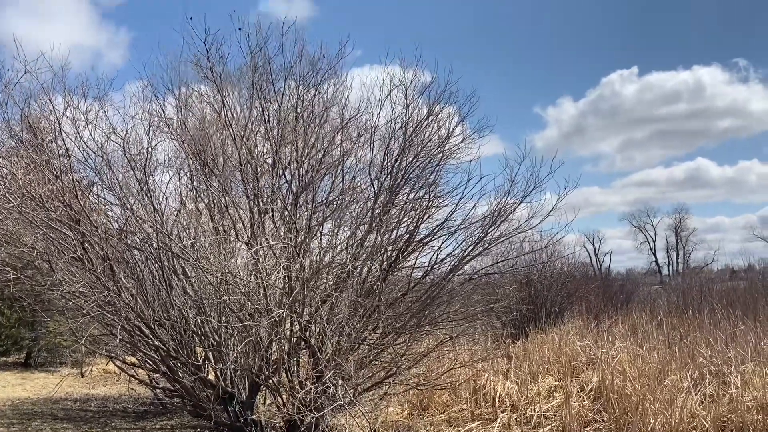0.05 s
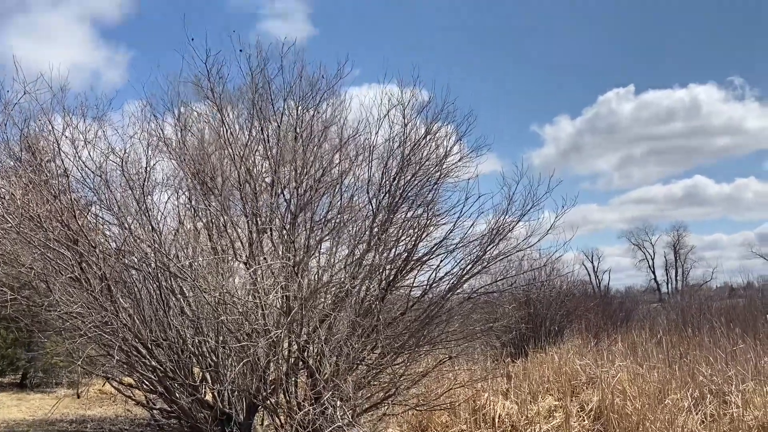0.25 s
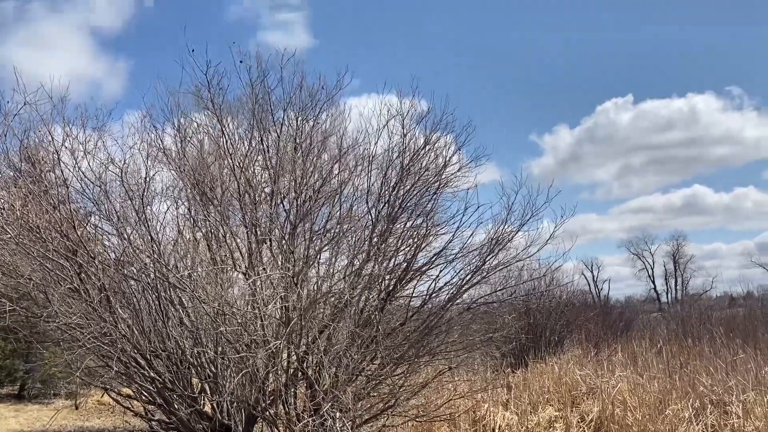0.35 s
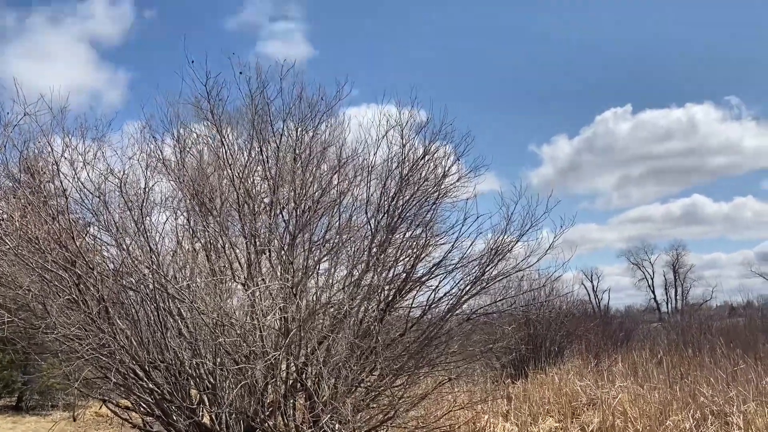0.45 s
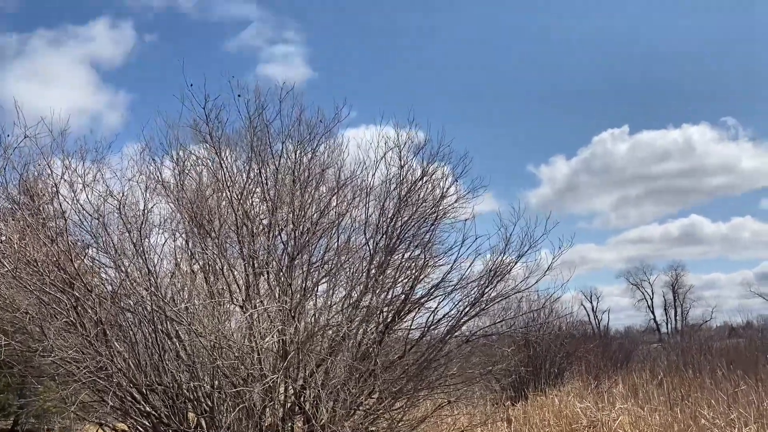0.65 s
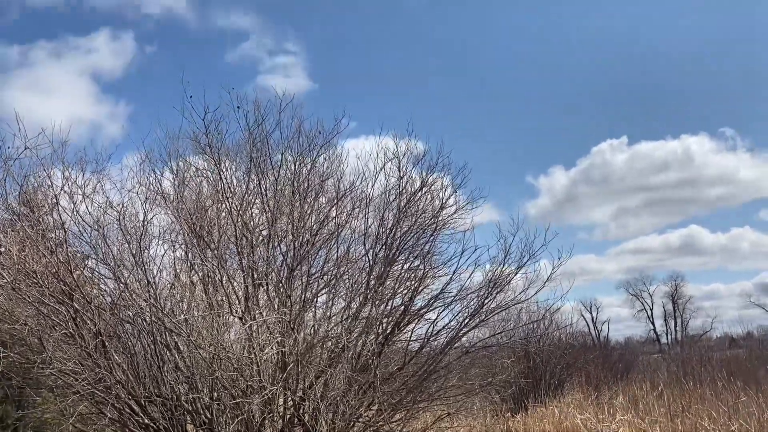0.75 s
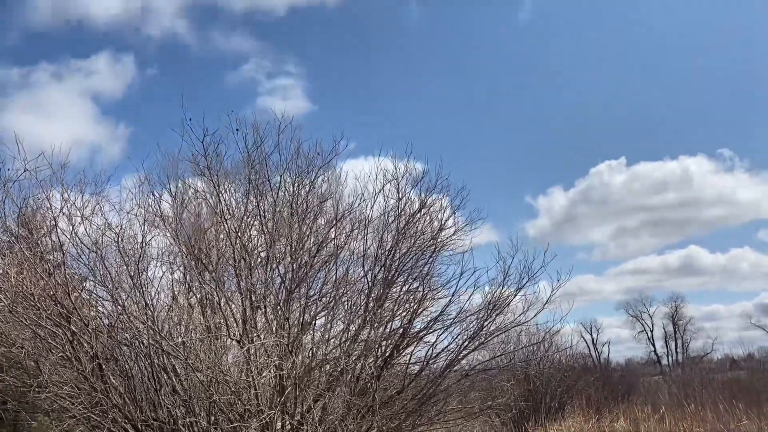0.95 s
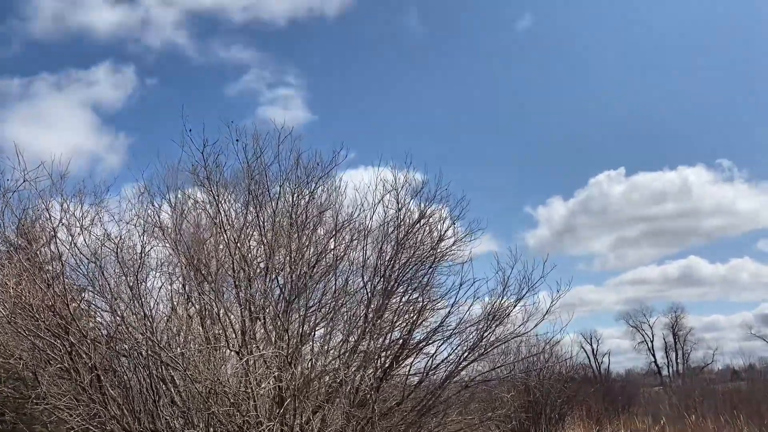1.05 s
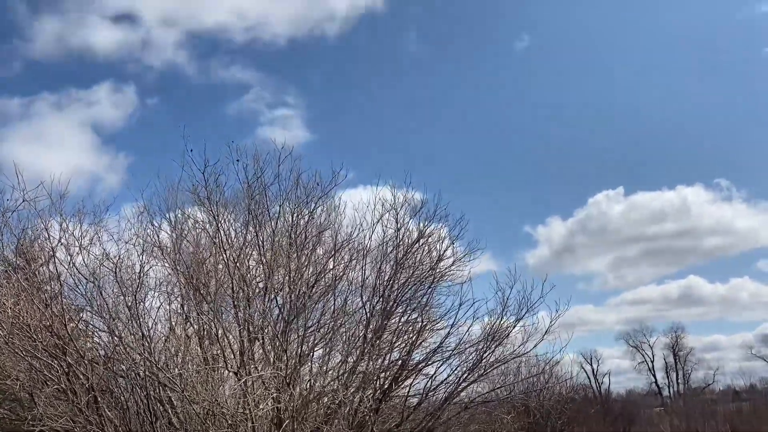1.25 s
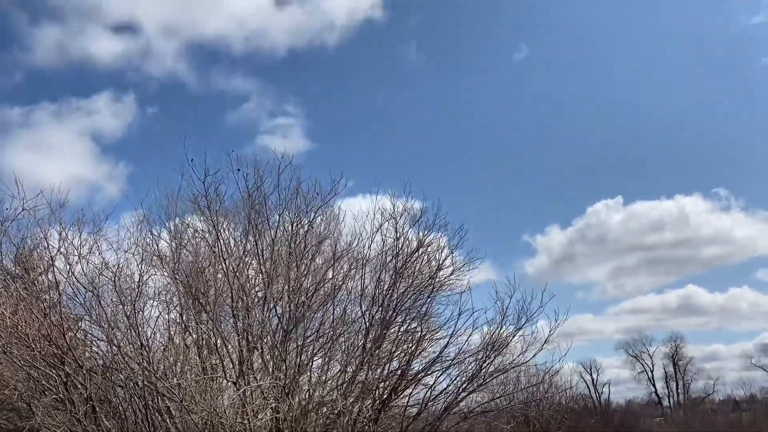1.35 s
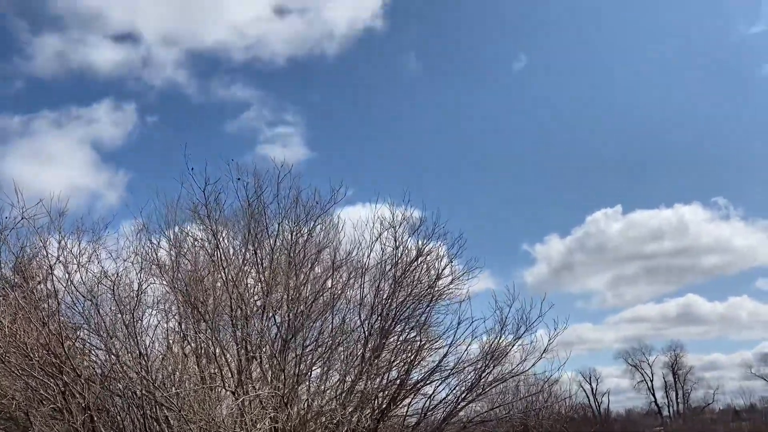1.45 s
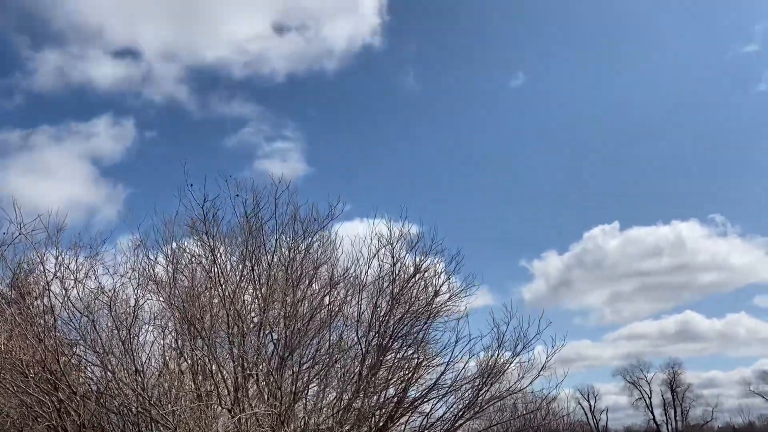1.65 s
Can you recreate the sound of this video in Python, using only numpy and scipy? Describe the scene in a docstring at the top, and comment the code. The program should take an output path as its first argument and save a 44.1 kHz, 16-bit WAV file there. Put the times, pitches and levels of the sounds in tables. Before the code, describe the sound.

A dense chorus of small frogs calls throughout, dry ticks close by over a trill farther off. At about 0.3 seconds a wind gust rumbles on the microphone, followed by faint, falling chirps of distant birds. Near 1 second another gust hits, one frog adds lower clacks and the close ticks shift left. The trill eases slightly toward 1.7 seconds, with a very faint rustle of dry grass.

```python
"""A reedy marsh in open country, a stereo microphone set out in the wind among small frogs.
From the start they call in runs of short dry pulses: single ticks close by, dozens merging into a trill
farther off. At 0.3 s a gust rumbles and buffets on the microphone, then distant birds slur down over the
chorus. Near 1 s a second gust hits, one frog adds a run of lower clacks and the close ticks lean left.
Toward 1.7 s the trill eases and dry grass rustles faintly."""
import sys
import numpy as np
from scipy import signal
from scipy.fft import rfft, irfft
from scipy.io import wavfile
from scipy.ndimage import uniform_filter1d

SR = 44100
rng = np.random.default_rng(int(sys.argv[2]) if len(sys.argv) > 2 else 0)


def store_pcm(level_fs):
    """Save levels as 16-bit WAV."""
    pcm = np.round(np.clip(level_fs, -1, 1) * 32767).astype(np.int16)
    wavfile.write(sys.argv[1], SR, np.atleast_2d(pcm).T)


N = 74970
T = np.arange(N) / SR

# ticks of the closest frogs: peak_s, main_db, main_hz, fundamental_db (an octave below the main partial)
NEAR_TICKS = [(0.0093, -38, 3296, -52), (0.028, -42, 3460, -48.5), (0.0487, -57, 3290, -51.0),
              (0.0831, -36.5, 3296, -52.5), (0.151, -36.5, 3350, -52.5), (0.2006, -44, 3730, -65),
              (0.2085, -43.5, 3190, -51), (0.2204, -41.5, 3530, -55), (0.2591, -44.5, 3370, -56),
              (0.2717, -41.0, 3270, -53), (0.2933, -41.5, 3644, -50.5), (0.3336, -42.5, 3340, -56),
              (0.3718, -42.5, 3350, -58), (0.393, -43, 3320, -53), (0.4335, -39.5, 3370, -52),
              (0.4467, -44.5, 3390, -53), (0.4616, -42.5, 3460, -68), (0.4836, -42.5, 3150, -55),
              (0.511, -41, 3530, -52), (0.532, -42.5, 3230, -56), (0.5429, -50, 3300, -55),
              (0.5569, -44, 3410, -58), (0.5823, -40.0, 3240, -61), (0.5994, -41, 3424, -58),
              (0.609, -40.5, 3380, -57), (0.6355, -38.5, 3317, -56), (0.6639, -39.5, 3330, -66),
              (0.6781, -38.5, 3424, -57), (0.6923, -40, 3310, -62), (0.7433, -40, 3370, -54),
              (0.7519, -38.0, 3310, -54), (0.7877, -43, 3560, -62), (0.811, -38.5, 3460, -51),
              (0.828, -44.0, 3380, -57), (0.8549, -37, 3347, -51), (0.8705, -39.5, 3406, -46.5),
              (0.8971, -39, 3510, -53), (0.9058, -34.5, 3310, -52.5), (0.9208, -40.0, 3430, -58),
              (0.9463, -47, 3350, -51), (0.9565, -38, 3500, -49), (0.9664, -40.5, 3474, -62),
              (0.9819, -38, 3586, -50), (1.0081, -44, 3450, -50), (1.0464, -43.5, 3380, -54),
              (1.0609, -35.5, 3484, -49.5), (1.07, -38, 3690, -50), (1.105, -50, 3520, -57),
              (1.1194, -37.5, 3600, -45), (1.1567, -39.5, 3600, -51.0), (1.1863, -41, 3610, -55),
              (1.2189, -40.5, 3440, -59), (1.2383, -44.0, 3680, -49), (1.2602, -41.5, 3680, -50),
              (1.3379, -43.5, 3690, -51.5), (1.351, -43.5, 3440, -58), (1.3782, -43.5, 3280, -69),
              (1.3917, -46.5, 3000, -74), (1.4137, -47, 3830, -54), (1.4281, -41.5, 3475, -64),
              (1.4366, -55, 3380, -64), (1.4443, -46.5, 3105, -74), (1.4793, -45.0, 3334, -63),
              (1.5055, -41.5, 3460, -55), (1.5305, -46.5, 3235, -59), (1.5581, -42, 3310, -57),
              (1.5857, -44, 3320, -52.5), (1.6025, -47.5, 3445, -68), (1.6164, -40.5, 3208, -62),
              (1.6316, -43, 3540, -61), (1.64, -48, 3290, -56.5), (1.6671, -45.5, 3225, -58),
              (1.6796, -44, 3195, -52)]
NEAR_TRIM_DB, FUNDAMENTAL_TRIM_DB = 1.3, 1.8  # added to the two level columns
# where the closest callers sit: time_s, left_minus_right_db
NEAR_BALANCE = [(0, 0), (.7, 1), (1.05, 4.5), (1.7, 5)]
PULSE_RISE_S, FUNDAMENTAL_RISE_S = .0036, .0026  # the fundamental peaks and dies sooner: a woody tick
PULSE_SHARPNESS, PULSE_SAG_HZ_PER_S, THIRD_PARTIAL_DB = 7.5, 5000, -28.5
SCATTER_DB, SCATTER_T60_S = -4.5, .024  # echoes off reeds and shrubs

# swell of the far chorus: time_s, gain_db
CHORUS_GAIN = [(0, 1), (.35, -1.5), (.65, -1), (.95, 0), (1.2, -0.5), (1.4, -1.5), (1.7, -3.5)]
# its middle pitch wanders as callers take over from each other: time_s, offset_hz
CHORUS_PITCH_DRIFT = [(0, -12), (.35, -21), (.7, -37), (.95, 78), (1.1, 157), (1.27, 141), (1.42, -115),
                      (1.7, -120)]
# blur of the most distant frogs: frequency_hz, density_db
BLUR_SPECTRUM = [(1100, -22.5), (1500, -10.5), (1750, -9.5), (1950, -4.5), (2200, -14.5), (2650, -13.5),
                 (2950, -7.5), (3200, 4), (3550, 1.5), (3850, 0.5), (4150, -13), (5000, -17), (6000, -32.5),
                 (9000, -50)]
FROG_COUNT, FAR_HZ, FAR_SPREAD_HZ = 26, 3397, 314
FAR_DB, FAR_FUNDAMENTAL_DB, FAR_SPREAD_DB, BLUR_DB = -53.5, -8.5, 2, -56.5
PULSE_GAP_S, GAP_GROWTH_S_PER_S, CALL_S, REST_S = .052, .016, 1.0, .3

# one frog's run of drier, lower clacks: peak_s, level_db
CLACK_RUN = [(0.956, -46), (1.009, -46), (1.061, -46), (1.119, -50.5), (1.174, -44), (1.234, -53),
             (1.291, -51)]
CLACK_START_HZ, CLACK_END_HZ, CLACK_GLIDE_S, CLACK_RISE_S = 3680, 1540, .00071, .0011

# gusts on the microphone: time_s, level_db
GUSTS = [(0, -55), (.09, -47), (.165, -54), (.2, -47.5), (.3, -33.5), (.36, -41), (.44, -43), (.52, -42.5),
         (.575, -57.5), (.65, -52), (.78, -48), (.85, -52), (.89, -42), (.96, -34.5), (1.02, -42.5),
         (1.09, -42.5), (1.16, -61), (1.22, -47.5), (1.31, -58.5), (1.49, -52), (1.62, -47), (1.7, -54.5)]
# colour of their rumble: frequency_hz, density_db
RUMBLE_SPECTRUM = [(20, -48), (32, -12), (55, 10.5), (75, 8), (110, -1.5), (170, -10.5), (260, -29),
                   (450, -65.5), (1500, -73)]
# eddies that hit the microphone: peak_s, level_db, pitch_hz, half_length_s
EDDIES = [(0.199, -34.5, 60, 0.0099), (.257, -37, 176, 0.0056), (.267, -29, 93, 0.0045),
          (0.2921, -29, 181, 0.0057), (.3062, -18.5, 67.4, 0.0065), (0.413, -30.5, 69.4, 0.0061),
          (0.768, -44.5, 244, 0.0037), (.783, -39.5, 103, 0.0058), (0.89, -39, 180, 0.0054),
          (0.897, -43, 80, 0.0048), (0.9548, -25.5, 160, 0.0019), (0.9715, -26, 87, 0.0056),
          (0.984, -25.5, 52.4, 0.0047), (1.029, -44.5, 192, .0038), (1.07, -41.5, 129, 0.0026),
          (1.35, -43.5, 165, 0.005), (1.445, -44.5, 140, 0.0049), (1.54, -37.5, 68, 0.015),
          (1.613, -42.5, 115, 0.0061), (1.65, -37.5, 117, 0.0029)]
RUMBLE_TRIM_DB, RUMBLE_SIDE_DB = -1, -11.5
FLUTTER_DB, FLUTTER_TOP_HZ, FAST_EDDY_HZ = -17.5, 395, 189

# notes of distant birds: start_s, length_s, first_hz, last_hz, level_db
BIRD_SLURS = [(0, 0.018, 7300, 5300, -65.5), (0.491, .014, 4500, 3830, -60), (0.526, 0.04, 2840, 2020, -61),
              (0.571, .018, 4000, 4960, -65), (0.614, 0.018, 3350, 2470, -52),
              (0.646, 0.029, 3200, 2240, -55), (.668, 0.02, 4900, 4500, -67),
              (0.875, 0.031, 5450, 4800, -57.5), (.972, 0.041, 5440, 5190, -66),
              (0.993, 0.063, 5330, 4600, -61), (1.033, 0.02, 3130, 2310, -57),
              (1.036, 0.037, 4610, 4360, -58), (1.132, 0.029, 2810, 2150, -64),
              (1.42, 0.013, 5500, 4930, -62), (1.531, 0.013, 2960, 2240, -59)]
BIRD_WAVER_HZ, BIRD_WAVER_PER_S, BIRD_ROUGHNESS = 75, 600, .35

# dry grass in the breeze: time_s, level_db
RUSTLE_LEVEL = [(0, -98), (.07, -92), (.11, -80), (.2, -98), (.28, -72), (.35, -99), (.6, -84), (1.0, -104),
                (1.33, -86), (1.42, -75), (1.48, -82), (1.55, -75), (1.62, -86), (1.7, -67)]
# colour of the grass: frequency_hz, density_db
RUSTLE_SPECTRUM = [(2000, -10), (5000, -13), (7000, -18), (11000, -5), (15000, -27)]
# hush of open air: frequency_hz, density_db
AIR_SPECTRUM = [(100, 2.5), (250, 0.5), (450, -3.5), (900, -1.5), (1300, -7), (2400, -31), (4500, -35),
                (5900, -24), (7000, -26), (11000, -33), (13000, -29.5), (15000, -64)]
AIR_DB = -58

# how alike sound from all round is on the two sides: frequency_hz, correlation
SIDE_CORRELATION = [(100, 0.16), (250, 0.17), (550, -0.096), (1100, -0.45), (1800, 0.33), (3400, 0.76),
                    (5000, 0.82), (7500, 0.098), (11000, -0.13)]
# the two microphone ports differ in colour: frequency_hz, left_minus_right_db
PORT_COLOUR = [(250, 1), (650, 3.5), (1100, 2), (1600, -5.5), (2200, -2.5), (3200, 1), (5000, 0.5),
               (8000, 0)]
CUTOFF_HZ = 15900


def frog_pulse(hz, main_db, fundamental_db):
    """One puff through the larynx: three partials sag in pitch, the second boosted by the vocal sac."""
    t = T[:SR // 60]
    phase = np.pi * np.cumsum(hz - PULSE_SAG_HZ_PER_S * (t - PULSE_RISE_S)) / SR  # an octave below hz
    partials = [(1, fundamental_db, FUNDAMENTAL_RISE_S), (2, main_db, PULSE_RISE_S),
                (3, main_db + THIRD_PARTIAL_DB, PULSE_RISE_S)]
    return sum(from_db(db) * swell(t / rise_s, PULSE_SHARPNESS)
               * np.sin(harmonic * phase + rng.uniform(0, 2 * np.pi)) for harmonic, db, rise_s in partials)


def near_frogs():
    """Callers close to the microphone, a little to the left, each tick scattering off the reeds."""
    ticks = np.zeros(N)
    for peak_s, main_db, hz, fundamental_db in NEAR_TICKS:
        pulse = frog_pulse(hz, main_db + NEAR_TRIM_DB, fundamental_db + FUNDAMENTAL_TRIM_DB)
        add(ticks, peak_s - PULSE_RISE_S, pulse)
    return pan(in_time(NEAR_BALANCE)) * (ticks + from_db(SCATTER_DB) * echoes(ticks, SCATTER_T60_S))


def far_frogs():
    """Across the marsh, each frog at its own pitch and place gives a slowing run, rests and calls again."""
    chorus = np.zeros((2, N))
    chorus_hz = FAR_HZ + in_time(CHORUS_PITCH_DRIFT)
    for rank in np.linspace(-1, 1, FROG_COUNT):
        voice, side_db = np.zeros(N), rng.normal(0, 1.0)
        first_s, pace = -rng.random() * (CALL_S + REST_S), rng.uniform(.85, 1.25)
        for call, wobbles in enumerate(rng.uniform(-1, 1, (3, 24, 3))):  # 3 calls of up to 24 pulses
            age_s = 0
            for pitch, strength, depth in wobbles:
                start_s = first_s + call * (CALL_S + REST_S) + age_s
                if age_s < CALL_S and 0 <= start_s < T[-1]:
                    hz = chorus_hz[int(start_s * SR)] + FAR_SPREAD_HZ * rank + 80 * pitch
                    pulse = frog_pulse(hz, FAR_SPREAD_DB * strength, FAR_FUNDAMENTAL_DB + 4 * depth)
                    add(voice, start_s, pulse)
                age_s += pace * (PULSE_GAP_S + GAP_GROWTH_S_PER_S * age_s)
        chorus += pan(side_db) * voice
    scatter = from_db(-12) * echoes(chorus.mean(axis=0), SCATTER_T60_S)
    trill = from_db(FAR_DB) * rms_one(chorus + scatter)
    blur = from_db(BLUR_DB) * wide_noise(BLUR_SPECTRUM)
    return pan(left_db=4) * from_db(in_time(CHORUS_GAIN)) * (trill + blur)


def clacking_frog():
    """One frog just left of centre: very short pulses that drop about an octave within a few cycles."""
    clacks, t = np.zeros(N), T[:SR // 100]
    hz = CLACK_END_HZ + (CLACK_START_HZ - CLACK_END_HZ) * np.exp(-t / CLACK_GLIDE_S)
    clack = swell(t / CLACK_RISE_S, sharpness=2) * np.sin(2 * np.pi * np.cumsum(hz) / SR)
    for peak_s, db in CLACK_RUN:
        add(clacks, peak_s - CLACK_RISE_S, from_db(db) * clack)
    return pan(left_db=1.5) * (clacks + from_db(-6) * echoes(clacks, SCATTER_T60_S))


def wind():
    """Right on the microphone: a rumble that follows the gusts, and eddies that thump and flutter."""
    flow = noise(RUMBLE_SPECTRUM)
    flow = rms_one(flow / np.sqrt(uniform_filter1d(flow ** 2, size=2200) + .01))  # evened over 50 ms
    side = from_db(RUMBLE_SIDE_DB) * noise(RUMBLE_SPECTRUM) * [[1], [-1]]
    rumble = from_db(in_time(GUSTS) + RUMBLE_TRIM_DB) * (flow + side)
    thumps, force = np.zeros(N), np.zeros(N)
    for peak_s, db, hz, half_s in EDDIES:
        push = from_db(db) * np.exp(-((T - peak_s) / half_s) ** 2)
        thumps += push * np.sin(2 * np.pi * hz * (T - peak_s))
        force += push * hz / FAST_EDDY_HZ  # slower eddies flutter less
    band = signal.butter(5, [90, FLUTTER_TOP_HZ], "band", fs=SR, output="sos")
    flutter = rms_one(signal.sosfilt(band, rng.standard_normal((2, N))))
    return rumble + thumps + from_db(FLUTTER_DB) * force * flutter


def birds():
    """Thin slurred whistles, roughened and blurred by distance."""
    song = np.zeros(N)
    for start_s, length_s, first_hz, last_hz, db in BIRD_SLURS:
        progress = np.linspace(0, 1, int(length_s * SR))
        steps = progress * length_s * BIRD_WAVER_PER_S
        waver, flicker = (np.interp(steps, np.arange(40), row) for row in rng.standard_normal((2, 40)))
        hz = first_hz + (last_hz - first_hz) * progress + BIRD_WAVER_HZ * waver
        envelope = from_db(db) * np.sin(np.pi * progress) * (1 + BIRD_ROUGHNESS * flicker)
        add(song, start_s, envelope * np.sin(2 * np.pi * np.cumsum(hz) / SR))
    return pan(left_db=1) * (song + from_db(-2) * echoes(song, t60_s=.18))


def air_and_grass():
    """All round the microphone: the hush of open air, and dry grass rustling in the breeze."""
    hush = from_db(AIR_DB) * wide_noise(AIR_SPECTRUM)
    return hush + from_db(in_time(RUSTLE_LEVEL)) * wide_noise(RUSTLE_SPECTRUM)


def echoes(x, t60_s):
    """A diffuse dying tail, different on each side, about as strong as the sound itself."""
    t = T[:N // 4]
    tail = rng.standard_normal((2, len(t))) * from_db(-60 * t / t60_s) * (1 - np.exp(-t / .003))
    tail /= np.sqrt(np.sum(tail ** 2, axis=1, keepdims=True))
    return signal.fftconvolve(x[None], tail, axes=1)[:, :N]


def wide_noise(spectrum):
    """Stereo noise from all round, partly alike on the two sides, rms 1."""
    alike = at_bins(SIDE_CORRELATION, N)
    mid = irfft(rfft(noise(spectrum)) * np.sqrt(1 + alike), N)
    side = irfft(rfft(noise(spectrum)) * np.sqrt(1 - alike), N)
    return rms_one(np.array([mid + side, mid - side]))


def noise(spectrum):
    """Mono noise of a given colour, rms 1."""
    return rms_one(irfft(rfft(rng.standard_normal(N)) * from_db(at_bins(spectrum, N)), N))


def swell(age, sharpness):
    """An envelope that peaks at age 1; higher sharpness makes it narrower and more even."""
    return (age * np.exp(1 - age)) ** sharpness


def from_db(db):
    """Decibels to gain."""
    return 10 ** (np.asarray(db) / 20)


def rms_one(x):
    """Scale to an rms of 1."""
    return x / np.sqrt(np.mean(x ** 2) + 1e-20)


def in_time(rows):
    """A time_s, value table read at every sample."""
    return np.interp(T, *np.transpose(rows))


def at_bins(rows, samples):
    """A frequency_hz, value table read at every FFT bin, on a log-frequency axis."""
    hz, values = np.transpose(rows)
    return np.interp(np.log(np.fft.rfftfreq(samples, 1 / SR) + 1), np.log(hz), values)


def pan(left_db):
    """Left and right gains for a level difference."""
    return from_db(np.array([[.5], [-.5]]) * left_db)


def add(out, start_s, sound):
    """Mix a sound in at a time, cut at the ends."""
    i = int(start_s * SR)
    lo, hi = max(i, 0), min(i + len(sound), N)
    if hi > lo:
        out[lo:hi] += sound[lo - i:hi - i]


def scene():
    """The marsh from where the microphone stands: frogs, birds and wind over air and grass."""
    background = air_and_grass()
    return near_frogs() + clacking_frog() + far_frogs() + birds() + wind() + background


def record(dry):
    """The microphone ports colour each side a little differently; the top is cut steeply."""
    edge = SR // 20  # room for the filters to settle
    padded = np.pad(dry, ((0, 0), (edge, edge)), mode="reflect", reflect_type="odd")
    samples = padded.shape[1]
    coloured = irfft(rfft(padded) * pan(at_bins(PORT_COLOUR, samples)), samples)
    lowpass = signal.cheby2(12, 70, CUTOFF_HZ, fs=SR, output="sos")
    return signal.sosfilt(lowpass, coloured)[:, edge:-edge]


dry = scene()
out = record(dry)
store_pcm(out)
```